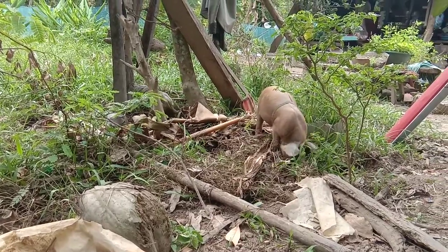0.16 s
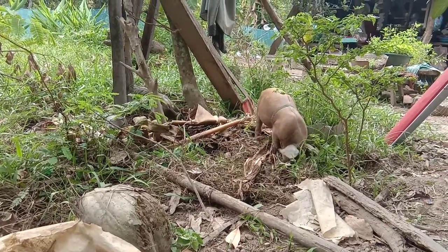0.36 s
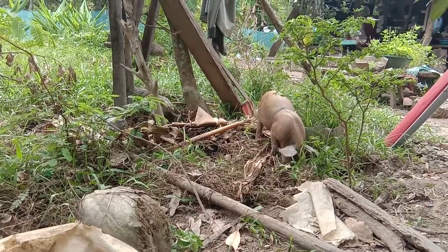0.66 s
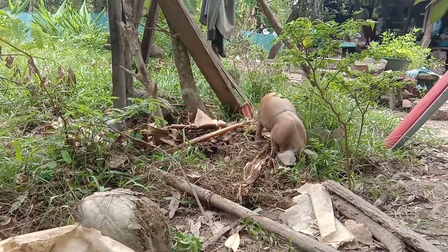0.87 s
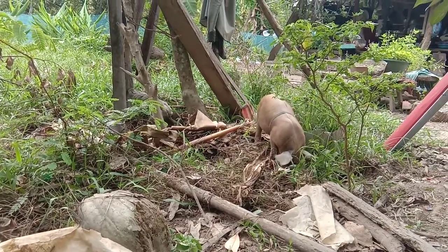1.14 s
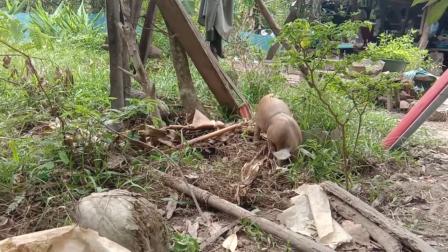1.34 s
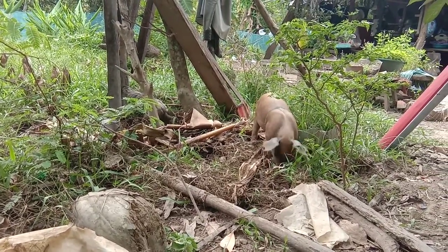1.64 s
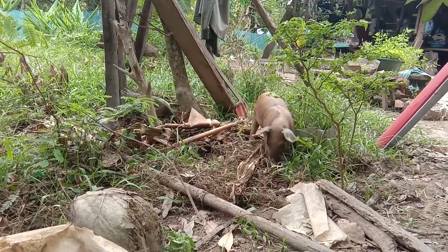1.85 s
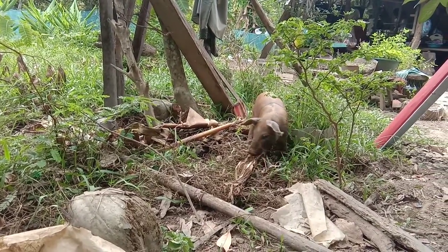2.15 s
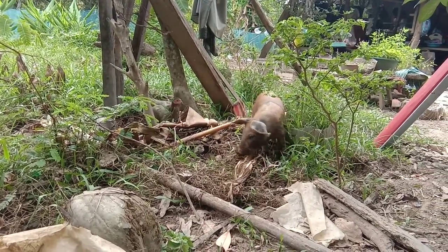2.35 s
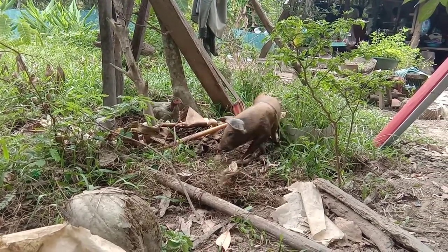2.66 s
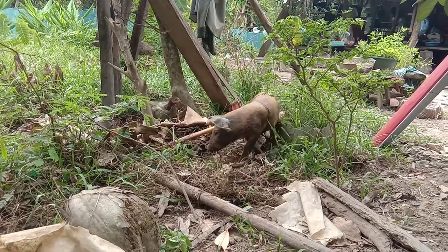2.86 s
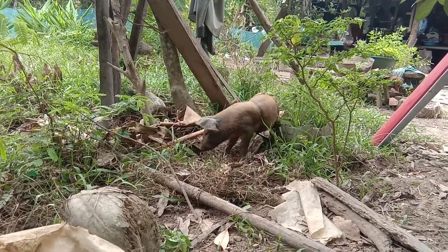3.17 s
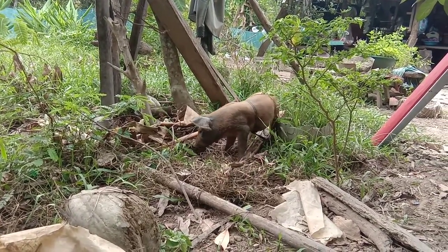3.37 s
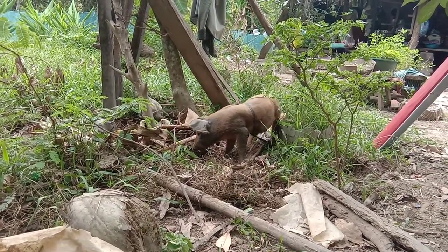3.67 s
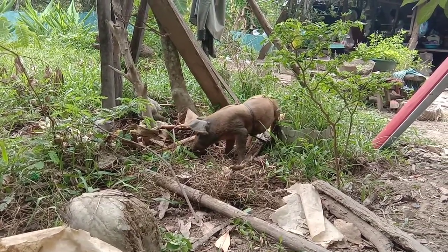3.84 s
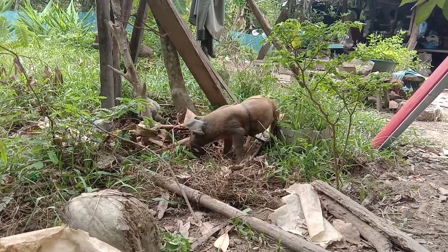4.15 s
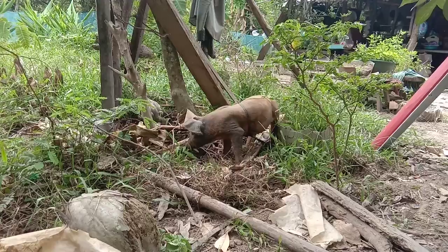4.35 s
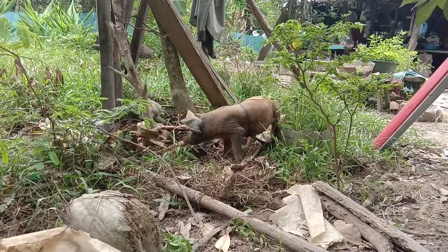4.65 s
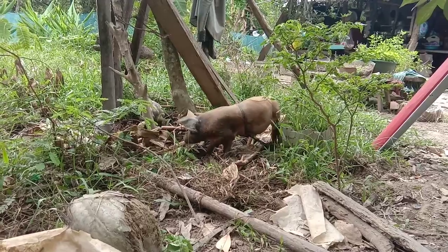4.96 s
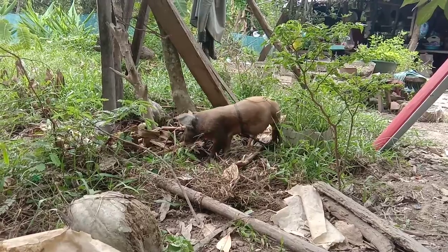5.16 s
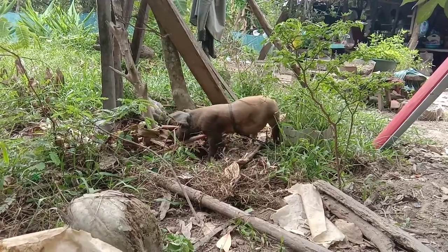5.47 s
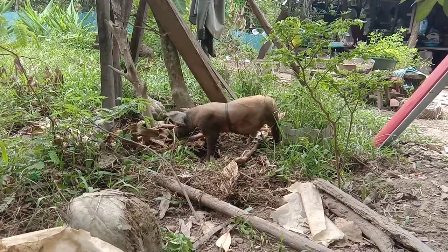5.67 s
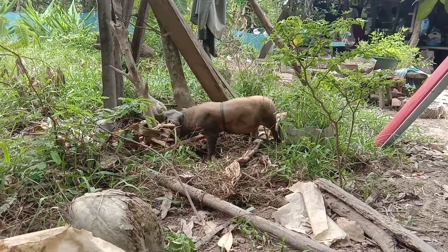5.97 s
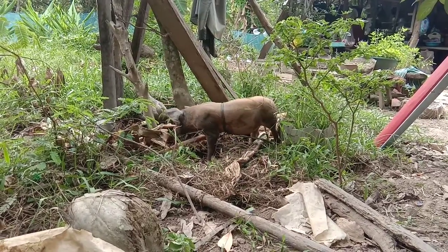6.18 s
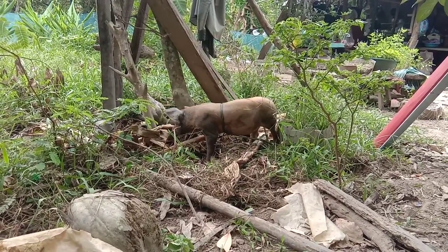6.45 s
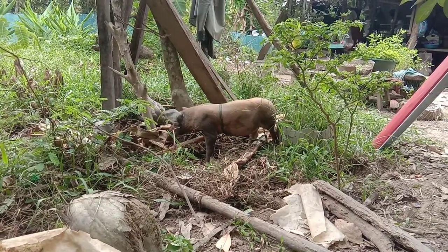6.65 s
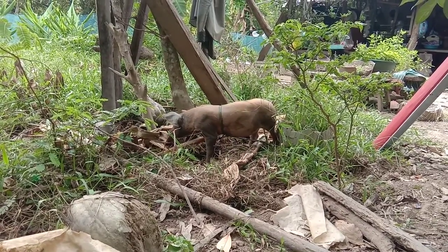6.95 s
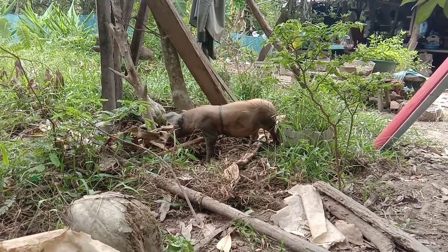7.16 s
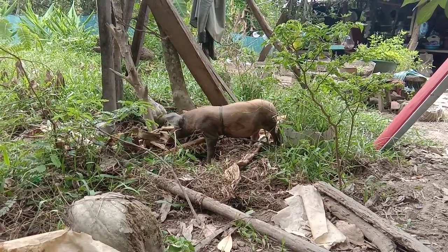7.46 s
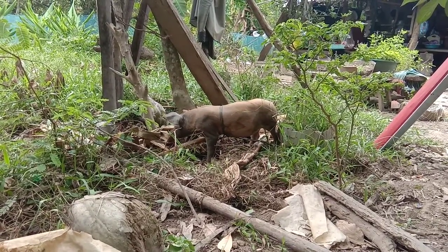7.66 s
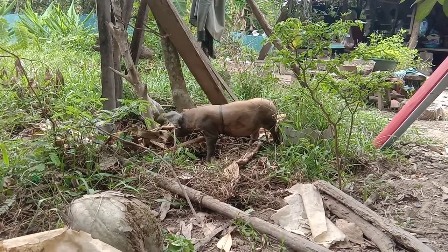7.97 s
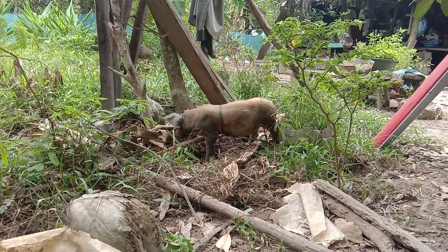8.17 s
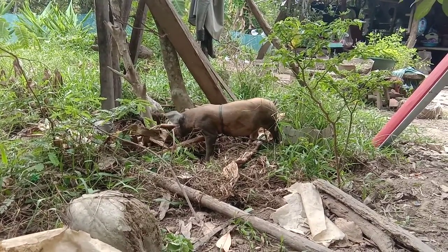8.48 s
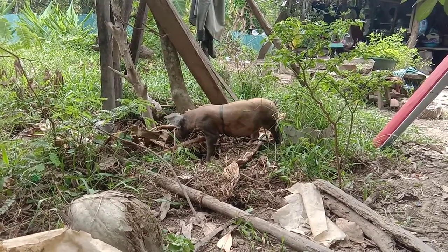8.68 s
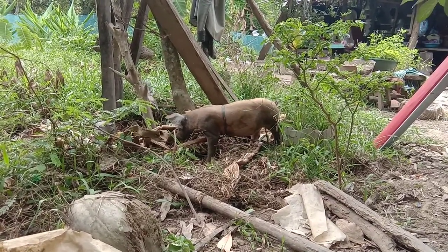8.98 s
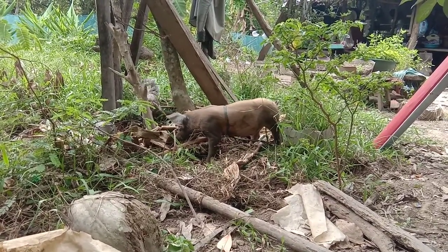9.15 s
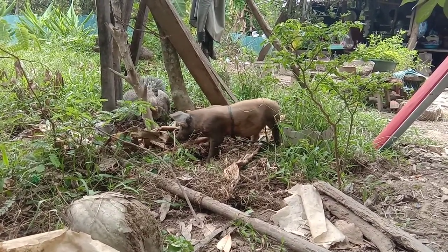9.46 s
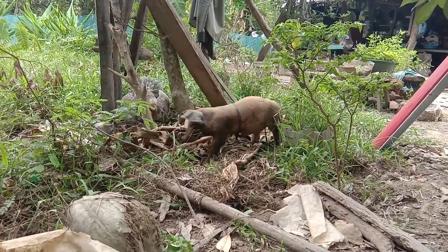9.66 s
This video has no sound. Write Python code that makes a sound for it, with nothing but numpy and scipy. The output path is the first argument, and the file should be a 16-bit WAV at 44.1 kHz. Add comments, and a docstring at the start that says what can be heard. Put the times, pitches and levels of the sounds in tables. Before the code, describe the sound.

High, falling chick peeps over soft yard hiss, with scattered hen clucks, one squawk, leaf crackle, snapping twigs and a late wing flurry.

```python
"""A rural yard: a hen and her chicks among dry leaves, picked up almost in mono by a phone.
The chicks peep and trill with gliding near-sines; the hen clucks, whines and squawks once, harmonics
ringing in her throat. Leaves rustle in tiny grains as a piglet roots, twigs crack, and at the end
a chicken flaps up with bursts of noise. Thin calls of small birds come from far off over a low, hissing
yard air; weak echoes return from posts and sheds."""
import sys
import numpy as np
from scipy import signal
from scipy.fft import rfft, irfft, next_fast_len
from scipy.io import wavfile

SR = 44100
rng = np.random.default_rng(int(sys.argv[2]) if len(sys.argv) > 2 else 0)


def dump_mix(stems):
    """Bounce the given channels to the path in sys.argv[1] as a 16-bit WAV at rate SR."""
    frames = np.atleast_2d(stems).T  # one column per channel
    limited = np.clip(frames, -1, 1)  # hard clip at full scale
    pcm = np.round(limited * 32767).astype(np.int16)
    wavfile.write(sys.argv[1], SR, pcm)


N = 433062
TIME = np.arange(N) / SR
CUTOFF_HZ = 15300  # top of the phone's range


def undb(db):
    """Decibels to an amplitude factor."""
    return 10 ** (np.asarray(db) / 20)


def unit(x):
    """Scale to rms 1."""
    return x / np.sqrt(np.mean(x ** 2) + 1e-20)


def curve(rows, t):
    """Columns of a table joined by straight lines in time."""
    times, *columns = np.transpose(rows)
    return [np.interp(t, times, column) for column in columns]


def add(out, start, x):
    """Mix x in from a start in seconds."""
    i = max(int(start * SR), 0)
    out[i:i + len(x)] += x[:max(len(out) - i, 0)]


def colour(x, outline):
    """Filter by an outline of frequency in Hz and gain in dB."""
    hz, db = np.transpose(outline)
    f = np.fft.rfftfreq(len(x), 1 / SR) + 1
    gain_db = np.interp(np.log(f), np.log(hz), db)
    return irfft(rfft(x) * undb(gain_db), len(x))


def band(size, hz, width_hz):
    """Noise in one rounded band, rms 1."""
    n = next_fast_len(size)
    f = np.fft.rfftfreq(n, 1 / SR)
    spectrum = rfft(rng.standard_normal(n)) / (1 + ((f - hz) / width_hz) ** 4)
    return unit(irfft(spectrum, n)[:size])


def walk(size, rate):
    """Smooth chance with a spread near 1: random points, rate per second, joined by lines."""
    u = np.arange(size) * rate / SR
    count = int(u[-1]) + 2
    # joining by lines shrinks the spread; the factor restores it
    return np.sqrt(3 / 2) * np.interp(u, np.arange(count), rng.standard_normal(count))


# Outline of the distant hiss. Each row: frequency in Hz, relative level in dB.
YARD_HISS = [(15, -35), (25, -16), (104, 4), (204, -6.5), (322, -14), (445, -14.5), (614, -15), (1750, -15),
             (3000, -15), (4150, -13), (5000, -14.5), (5570, -11), (7700, -11.5), (9810, -24.5),
             (15500, -29.5)]
# Low rumble of the air. Each row: time in seconds, level in dB before the overall trim.
RUMBLE = [(0, -50), (.3, -66.5), (2.5, -60), (3.3, -66), (3.7, -56), (4.2, -57.5), (5, -53.5), (6.1, -56),
          (6.6, -56.5), (8.2, -63.5), (9.4, -58), (9.8, -60)]


def yard_air(hiss_db=-53.5, rumble_trim_db=-3.0, flicker_db=2.0):
    """Distant outdoor hiss over a low rumble whose bands swell each on their own."""
    hiss = unit(colour(rng.standard_normal(N), YARD_HISS))
    hiss = hiss * undb(hiss_db + .5 * walk(N, 6.6))
    bands = band(N, 59.3, 14.4), 0.79 * band(N, 99.4, 27.0), 0.37 * band(N, 195, 48.0)
    rumble = unit(sum(b * undb(flicker_db * walk(N, 13)) for b in bands))
    return hiss + rumble * undb(curve(RUMBLE, TIME)[0] + rumble_trim_db)


def surroundings(x, near_db, far_db, near_s=0.014, t60=0.21):
    """Quick scatter from ground and posts, then a thin tail from trees and sheds."""
    t = np.arange(SR // 2) / SR
    near = rng.standard_normal(len(t)) * (rng.random(len(t)) < .02)  # sparse returns
    near = near * np.exp(-t / near_s) * (t > .002)
    far = rng.standard_normal(len(t)) * undb(-60 * t / t60) * (t > .015)
    echo = undb(near_db) * near / np.linalg.norm(near) + undb(far_db) * far / np.linalg.norm(far)
    return x + signal.fftconvolve(x, echo)[:N]


def bounces(x, db, spread_s=.012, late_db=-16, count=4):
    """Ground and posts return quick copies, a shed wall one late one; paths differ for each call."""
    paths = rng.random((count, 2))
    out = np.r_[x, np.zeros(SR // 10)]
    for lag, size in paths:
        copy = x * undb(db) * (size + .5) * rng.choice([-1, 1])
        add(out, 0.00043 + spread_s * lag ** 2, copy)
    add(out, 0.023 + .025 * rng.random(), x * undb(late_db))
    return out * np.linalg.norm(x) / np.linalg.norm(out)  # echoes add no energy


def whistle(hz, waver, octave_db=-30):
    """A tiny syrinx: nearly a sine, with a faint octave."""
    phase = 2 * np.pi * np.cumsum(hz * (1 + waver * walk(len(hz), 523.7))) / SR
    return np.sqrt(2) * (np.sin(phase) + undb(octave_db) * np.sin(2 * phase))


# Thin calls of a distant bird. Each row: start in seconds, level in dB before the trees smear it.
TSIPS = [(0.451, -48), (.88, -54), (1.39, -48), (1.97, -48.5), (3.321, -48.5), (4.012, -50), (4.56, -48.5),
         (4.97, -53), (5.56, -46), (6.283, -46), (6.729, -48.5), (7.291, -47), (7.931, -45.5), (8.549, -47),
         (9.03, -55.5)]
# Chirps of a second distant bird. Each row: start in seconds, first pitch in Hz, drop in Hz,
# level in dB before the smear, pitch waver as a share.
FAR_CHIRPS = [(4.79, 3445, 600, -51, 0.062), (7.76, 3120, 40, -57.5, 0.024)]


def far_birds(top_hz=7550, dip_hz=1000, length_s=.1, smear_s=0.017):
    """A thin warbling note and a few lower chirps, all smeared by the trees."""
    out = np.zeros(N)
    u = np.linspace(0, 1, int(length_s * SR))
    for start, db in TSIPS:
        hz = top_hz - dip_hz * np.sin(2 * np.pi * u) ** 4 * (1 - u ** 2)
        swell = np.minimum(u / 0.012, 1) * (1 - u) ** .5
        add(out, start, whistle(hz, waver=0.015) * undb(db) * swell)
    for start, hz, drop_hz, db, waver in FAR_CHIRPS:
        add(out, start, whistle(hz - drop_hz * u, waver) * undb(db) * np.sin(np.pi * u) ** .5)
    t = np.arange(SR // 3) / SR
    trees = rng.standard_normal(len(t)) * np.exp(-t / smear_s)
    return signal.fftconvolve(out, trees / np.linalg.norm(trees))[:N]


# Feet, snout and wings stir the dry leaves. Each row: start of the full stir in seconds,
# length in seconds, level in dB.
STIRS = [(.02, 0.18, -58.5), (2.278, 0.044, -59), (2.398, 0.036, -53), (2.523, 0.12, -49),
         (2.679, 0.076, -56), (2.808, 0.029, -50.5), (3.02, 0.071, -50), (3.265, 0.1, -52),
         (4.67, 0.083, -51), (4.853, 0.2, -57.5), (5.12, 0.24, -59), (5.344, 0.059, -59),
         (5.506, 0.19, -53.5), (5.766, 0.14, -55), (6.109, 0.027, -45), (8.244, 0.015, -54),
         (9.03, .03, -58.5), (9.642, 0.042, -42), (9.762, 0.081, -42)]
# Outline of the crackle. Each row: frequency in Hz, relative level in dB.
LEAF_CRACKLE = [(300, -10.5), (1000, -17), (2500, -12), (5000, -1.5), (7500, -0.5), (9800, -13),
                (11500, -8.5), (15500, -12.5)]


def litter(grains_per_s=1700, spread_db=6, clump_db=2.0, shove_db=2.0, dense_db=-45):
    """Leaves crackle in clumps of tiny grains; a stir swells and settles, a hard one rustles densely."""
    force = np.zeros(N)
    for start, length, db in STIRS:
        # time constants: a short edge plus a share of the length
        attack_s, release_s = 0.018 + 0.58 * length, 0.018 + 0.22 * length
        before = np.minimum(TIME - start, 0)
        after = np.maximum(TIME - start - length, 0)
        force += undb(db) * np.exp(before / attack_s - after / release_s)
    density = np.minimum(grains_per_s / SR * (1 + (force / undb(dense_db)) ** 2), 1)
    sizes = undb(spread_db * np.minimum(rng.exponential(size=N), 3.5))
    grains = (rng.random(N) < density) * rng.choice([-1, 1], N) * sizes
    clumps = undb(clump_db * walk(N, 140) + shove_db * walk(N, 20))
    return unit(colour(grains / np.sqrt(density) * clumps, LEAF_CRACKLE)) * force


# Twigs cracking. Each row: start in seconds, approximate peak in dB, centre in Hz.
TWIGS = [(2.378, -39, 9000), (2.415, -30.5, 7060), (2.822, -40, 9000), (2.849, -34, 7100),
         (3.108, -41, 8340), (3.294, -30, 6740), (3.32, -43, 11000), (5.04, -42, 12000), (5.226, -27, 5430),
         (5.458, -38.5, 10000), (5.562, -28, 5350), (5.57, -35, 9500), (6.097, -30, 7340),
         (6.128, -31.5, 5500), (9.68, -31, 6460), (9.684, -27, 5970)]


def twigs(snap_s=0.0033):
    """A thin twig cracks with a brief, bright tick of decaying noise."""
    out = np.zeros(N)
    t = np.arange(SR // 40) / SR
    for start, db, hz in TWIGS:
        # noise of rms 1 peaks well above 1, so it is halved
        add(out, start, .5 * undb(db) * band(len(t), hz, 0.27 * hz) * np.exp(-t / snap_s))
    return out


# Wing strokes. Each row: middle in seconds, air thump in dB, feather slap in dB,
# time from the middle down to 1/e in seconds.
WINGBEATS = [(9.547, -54.5, -54.5, 0.008), (9.62, -49.5, -57, 0.018), (9.659, -50.5, -53, 0.01),
             (9.682, -41, -40.5, 0.0033), (9.698, -49, -48.5, 0.014), (9.795, -62, -51.5, 0.0037)]


def wings(feather_db=-3):
    """Each stroke pushes a puff of air, slaps the body and swishes the feathers."""
    out = np.zeros(N)
    t = np.arange(-SR // 30, SR // 30) / SR
    for middle, thump_db, slap_db, stroke_s in WINGBEATS:
        slap = band(len(t), 980, 610) + undb(feather_db) * band(len(t), 5100, 3000)
        stroke = undb(thump_db) * band(len(t), 184, 106) + undb(slap_db) * slap
        add(out, middle + t[0], stroke * np.exp(-(t / stroke_s) ** 2))
    return out


# Resonances of the hen's throat. Each row: centre in Hz, full width in Hz, relative gain in dB.
THROAT = [(218, 63, 10.5), (526, 280, 0), (740, 37, -8), (1019, 83, 2), (1240, 330, -0.5), (1676, 130, 1.5),
          (2325, 120, 11.5), (3560, 600, 13), (5540, 1500, 15.5)]


def hen_call(rows, ring_db=0, ring_hz=1030, hiss_db=-21, jitter=0.162, shimmer=2.06,
             closed_db=-15, rasp_db=-9, ring_width_hz=130):
    """Harmonics through the throat; a closed beak dulls, roughness shakes, one resonance may grow."""
    t = np.arange(rows[0][0], rows[-1][0], 1 / SR)
    hz, db, rough, beak = curve(rows, t)
    rough = np.clip(rough, 0, 1)
    shaken_hz = hz * (1 + jitter * (rough + 0.04) * walk(len(t), 451.0))
    phase = 2 * np.pi * np.cumsum(shaken_hz) / SR
    k = np.arange(1, 17)[:, None]  # harmonic numbers
    f = k * hz
    gain = sum(undb(g) / (1 + (2 * (f - centre) / width) ** 2) for centre, width, g in THROAT)
    octaves = np.log2(np.maximum(f / 800, 1))
    gain = gain * undb(closed_db * (1.5 - beak) * octaves) * (f < CUTOFF_HZ)
    ring = np.exp(-((f - ring_hz) / ring_width_hz) ** 2)
    gain = gain * undb(ring_db * np.linspace(0, 1, len(t)) * ring)
    gain /= np.sqrt(np.sum(gain ** 2, axis=0) / 2)
    lags = 2 * np.pi * rng.random(k.shape)  # the windpipe holds each harmonic back by its own amount
    voice = np.sum(gain * np.sin(k * phase + lags), axis=0)
    voice = voice * (1 + shimmer * rough * walk(len(t), 498.4))
    pulses = 1 + np.cos(phase)  # breath noise comes once a cycle
    rasp = undb(rasp_db) * rough * band(len(t), 600, 400) * pulses
    hiss = undb(hiss_db) * beak ** 2 * band(len(t), 2200, 2000) * pulses  # air through the open beak
    return (voice + rasp + hiss) * undb(db) * signal.windows.tukey(len(t), .05)


def broken_cluck(start, growl_s, knee_hz, top_hz, close_hz, db, growl_db, beak, growl_rough=0.22):
    """Rows of a call that starts hoarse, climbs, breaks into a sagging growl and jumps up to close."""
    climb_s, break_s, close_s = .046, 0.007, 0.021
    growl_hz, sag_hz = 263.3, 1196 * growl_s  # it sags by 1196 Hz per second
    growl = start + climb_s + break_s
    close = growl + growl_s + break_s
    # each row: time in seconds, pitch in Hz, level in dB, roughness 0-1, beak opening 0-1
    return [(start, 263, db - 6, .25, 0),
            (start + .4 * climb_s, knee_hz, db - 0.5, .08, beak),
            (start + climb_s, top_hz, db - 3.5, .1, beak),
            (growl, growl_hz, growl_db - 1.0, growl_rough, .25),
            (growl + growl_s / 2, growl_hz - sag_hz / 2, growl_db, growl_rough, .15),
            (growl + growl_s, growl_hz - sag_hz, growl_db - 5, growl_rough, .15),
            (close, close_hz, db, .15, beak),
            (close + close_s / 2, close_hz, db + 2.0, .08, beak),
            (close + close_s, 0.88 * close_hz, db - 11, .2, 0)]


# The hen's whine and her squawk. Each row: time in seconds, pitch in Hz, level in dB,
# roughness 0-1, beak opening 0-1.
WHINE = [(2.945, 822, -57.5, 0.62, 0.9), (3.0, 885, -42, 0.26, 0.14), (3.025, 919, -72, 0.3, .1),
         (3.055, 927, -38, 0.1, 0.3), (3.07, 963, -31.5, 0, 0.15), (3.086, 956, -34, 0, .13),
         (3.097, 936, -66, 0.1, .1), (3.14, 826, -47, 0.13, 0), (3.165, 790, -71, 0.2, .1)]
SQUAWK = [(8.378, 249, -52, .5, 0), (8.397, 262, -48.5, 0.31, 0.1), (8.43, 311.5, -53.5, 0.41, 0.71),
          (8.45, 881, -60, .1, 0), (8.475, 864, -58, .05, 0), (8.486, 738, -48, .16, 0),
          (8.497, 477, -39, 0.14, 0.47), (8.52, 468, -37.5, 0.036, 0.94), (8.545, 489, -33.5, 0.27, .82),
          (8.57, 456.4, -35, 0.079, 0.94), (8.6, 465.6, -34, 0.048, 0.91), (8.62, 462.5, -38.5, 0.18, 0.95),
          (8.65, 328, -55, 0.77, .4)]
# Calls that break between registers. Each row: start in seconds, growl length in seconds,
# mid-climb pitch in Hz, top pitch in Hz, closing pitch in Hz, reference level in dB,
# mid-growl level in dB, beak opening 0-1, resonance in Hz, resonance gain by the end in dB.
BROKEN_CLUCKS = [(.227, 0.049, 421.5, 434, 508, -38.5, -37.5, 0.56, 1040, 13),
                 (1.916, .042, 357, 542, 444, -44.5, -40.5, 0.25, 220, 4),
                 (5.885, .012, 430, 484, 654, -42, -41, 0.05, 600, 14)]
# Short soft clucks. Each row: start in seconds, length in seconds, first pitch in Hz, last pitch in Hz,
# mid-call level in dB, mid-call roughness 0-1, beak opening 0-1.
CLUCKS = [(6.39, 0.05, 275, 261, -57, 0.58, 0), (6.705, 0.038, 294, 530, -45, 0.2, 0.1),
          (6.855, 0.047, 332, 478, -51.5, 0.33, 0.92), (7.016, 0.043, 336, 429, -47.5, 0.1, 0.56),
          (7.204, 0.044, 355, 344, -53, 0.25, 0.85), (7.391, 0.11, 389, 355, -51.5, 0.13, 0),
          (7.552, 0.057, 360, 323, -51, 0.23, .1), (8.238, 0.047, 1248, 1130, -51, 0.72, 0.2),
          (9.35, 0.03, 341, 458, -46, 0.29, 0.3)]


def hen(cluck_edge_db=-12, cluck_edge_rough=0.096):
    """A whine, a squawk, calls that break between registers, and soft clucks that glide in pitch."""
    out = np.zeros(N)
    add(out, WHINE[0][0], hen_call(WHINE))
    add(out, SQUAWK[0][0], hen_call(SQUAWK, ring_db=7.5, ring_hz=1120, ring_width_hz=350))
    for *course, ring_hz, ring_db in BROKEN_CLUCKS:
        add(out, course[0], hen_call(broken_cluck(*course), ring_db, ring_hz))
    u = np.linspace(0, 1, 9)
    edge = 1 - np.sin(np.pi * u)  # 1 at both ends, 0 in the middle
    for start, length, first_hz, last_hz, db, rough, beak in CLUCKS:
        hz = (first_hz + u * (last_hz - first_hz)) * (1 + 0.011 * rng.standard_normal(len(u)))
        swell_db = db + cluck_edge_db * edge + 2 * rng.standard_normal(len(u))
        roughness = rough + cluck_edge_rough * edge
        beaks = np.full(len(u), beak)
        rows = np.column_stack([start + u * length, hz, swell_db, roughness, beaks])
        add(out, start, hen_call(rows))
    return out


def peep(top_hz, fall_s, db, near_bounce_db=-14, far_bounce_db=-5, flutter_db=0.9):
    """An arch of pitch that plunges; a harder (higher) call climbs longer and drops deeper."""
    effort = np.clip((top_hz - 3500) / 1700, .15, 1.2)
    near = np.interp(db, [-52, -36], [0, 1])  # fainter chicks stand further off, among more echoes
    rise_s = .028 * effort
    t = np.arange(-rise_s, 1.1 * fall_s, 1 / SR)
    v = np.where(t < 0, t / rise_s, t / fall_s)  # -1 at the start, 0 at the top
    climb = 1 - 0.1676 * effort * v ** 2
    plunge = 1 - (0.0893 + .4 * effort) * np.abs(v) ** 1.5
    hz = top_hz * np.where(v < 0, climb, plunge)
    # weak peeps die away before the pitch has dropped far
    decay_db = (37 - 11 * effort) * np.maximum(v - .28 - 0.13 * near, 0)
    swell_db = flutter_db * walk(len(t), 148) - 12 * np.minimum(v, 0) ** 2 - decay_db
    # the throat rings as the falling pitch of a loud peep passes it
    ring = np.exp(-((hz - 4423) / 90) ** 2) * np.clip(4 * v, 0, 1)
    swell_db = swell_db + near * 6 * (ring - .25)
    edges = signal.windows.tukey(len(t), .1)
    bounce_db = far_bounce_db + near * (near_bounce_db - far_bounce_db)
    sound = whistle(hz, waver=0.0086, octave_db=-19.5) * undb(db + swell_db) * edges
    return rise_s, bounces(sound, bounce_db, late_db=bounce_db - 6)


def arched_note(length, hz, buzz, bow=0.057, buzz_hz=330):
    """A short arch of pitch and level; the two sides of the syrinx may beat into a buzz."""
    t = np.arange(0, length, 1 / SR)
    arch = np.sin(np.pi * t / length)
    beat = np.clip(buzz, 0, 1) * np.sin(2 * np.pi * buzz_hz * t)
    bent_hz = hz * (1 - bow * (1 - arch) + 0.073 * beat)
    return whistle(bent_hz, waver=0.0085) * (1 + beat) * np.sqrt(arch)


# A trill rings at both turns of its pitch. Each row: frequency in Hz, gain in dB.
TRILL_THROAT = [(3700, 3.5), (4300, 3), (4800, -7), (5450, 1.5), (5900, 0.5)]


def trill(length, rate, low_hz, high_hz, db, fade_db, drop_hz, waver,
          flutter_db=3.0, bounce_db=-15, drop_s=0.006):
    """A chain of round pitch arches, which may blur and drop at the close."""
    t = np.arange(0, length, 1 / SR)
    arches = np.abs(np.sin(np.pi * rate * t)) ** .7
    hz = low_hz + (high_hz - low_hz) * arches - drop_hz * np.exp((t - length) / drop_s)
    swell = undb(db + fade_db * (t / length - 1.0) + flutter_db * walk(len(t), 103))
    swell = swell * signal.windows.tukey(len(t), .1)
    return colour(bounces(whistle(hz, waver) * swell, bounce_db), TRILL_THROAT)


# Peeps of the chicks, near and far. Each row: time of the top of the arch in seconds,
# top pitch in Hz, fall in seconds, level in dB before its swell.
PEEPS = [(0.128, 4830, 0.046, -36.5), (0.169, 4660, 0.053, -47), (.27, 4763, 0.03, -38),
         (0.347, 4550, .034, -47.5), (.495, 4100, .045, -55), (.526, 4700, 0.045, -34),
         (0.657, 4660, 0.038, -41.5), (.682, 4320, 0.033, -46.5), (.713, 4760, 0.044, -44.5),
         (.802, 4220, 0.043, -48), (.824, 4920, 0.042, -38), (.872, 4890, 0.036, -44.5),
         (1.007, 4780, 0.053, -33), (1.176, 5110, 0.049, -36), (1.261, 4480, 0.047, -53),
         (1.384, 5055, 0.061, -36.5), (1.573, 5220, 0.057, -36.5), (1.736, 5350, 0.047, -31.5),
         (1.812, 4850, 0.035, -42.5), (1.903, 5100, 0.045, -32), (2.02, 4390, 0.046, -43.5),
         (2.079, 4990, 0.051, -35.5), (2.115, 5160, 0.037, -43), (2.157, 4780, 0.054, -43.5),
         (2.255, 4740, 0.044, -45), (2.274, 4860, 0.042, -33.5), (2.403, 4770, 0.046, -43.5),
         (2.475, 4920, 0.077, -40.5), (2.508, 4990, 0.05, -33.5), (2.577, 4940, 0.051, -44),
         (2.652, 4110, 0.035, -46.5), (2.748, 4580, 0.052, -38.5), (2.931, 4780, 0.046, -42.5),
         (3.336, 5090, 0.056, -43.5), (3.415, 4480, 0.055, -44.5), (3.513, 5160, 0.057, -37.5),
         (3.69, 4330, 0.027, -46), (3.771, 4880, 0.061, -42.5), (3.85, 4120, 0.049, -52.5),
         (3.992, 4730, 0.051, -40), (4.173, 4200, 0.062, -50.5), (4.282, 4850, 0.08, -46.5),
         (4.305, 4200, 0.031, -49), (4.51, 4715, 0.059, -45), (4.535, 4190, 0.031, -48),
         (4.72, 4260, .05, -57), (4.861, 4400, 0.07, -45), (4.92, 4450, 0.048, -54.5),
         (5.08, 4050, 0.039, -53.5), (5.145, 4630, 0.08, -56.5), (5.433, 4050, .046, -52.5),
         (5.531, 4410, 0.055, -52), (5.566, 4210, 0.025, -44.5), (5.655, 4110, 0.038, -53),
         (5.7, 4230, 0.049, -47.5), (5.79, 3990, 0.056, -53.5), (5.9, 4430, 0.055, -48),
         (6.177, 4390, 0.035, -43), (6.28, 3970, 0.033, -57), (6.4, 4490, 0.068, -53),
         (6.446, 4240, 0.063, -48.5), (6.569, 4900, 0.077, -53), (6.71, 4230, 0.043, -54.5),
         (6.84, 4120, 0.025, -50.5), (6.9, 4260, 0.049, -54.5), (7.02, 4260, 0.031, -54),
         (7.059, 4220, 0.069, -53.5), (7.215, 4700, 0.07, -53.5), (7.255, 4280, 0.047, -53),
         (7.365, 4200, 0.053, -55.5), (7.428, 4450, 0.042, -48), (7.462, 4980, 0.08, -53),
         (7.612, 4480, 0.04, -50), (7.695, 4260, 0.041, -50), (7.78, 4690, 0.077, -55),
         (7.855, 4350, 0.039, -50), (7.908, 3860, 0.049, -57), (7.976, 4430, 0.057, -52),
         (7.989, 4830, 0.062, -55), (8.014, 4090, 0.043, -51.5), (8.08, 4130, 0.04, -56),
         (8.16, 4260, 0.05, -50), (8.19, 4180, 0.045, -52), (8.28, 4860, 0.068, -48),
         (8.325, 4390, 0.053, -46.5), (8.474, 4540, 0.032, -51), (8.5, 4940, 0.049, -46.5),
         (8.902, 3820, 0.064, -54), (8.952, 4100, 0.044, -49), (9.04, 4080, 0.042, -54),
         (9.082, 4380, 0.042, -46.5), (9.191, 4270, 0.048, -48.5), (9.246, 4360, 0.037, -45),
         (9.285, 4300, 0.064, -52), (9.366, 4300, .03, -46), (9.38, 4460, 0.038, -43.5),
         (9.415, 4670, 0.051, -50), (9.46, 4640, 0.026, -48), (9.52, 4610, 0.038, -44.5),
         (9.557, 4220, .033, -48), (9.75, 4130, 0.046, -50.5)]
# Short arched notes: second voices at the tops of hard peeps, and the loud start of the last trill.
# Each row: start in seconds, length in seconds, pitch at the top of its arch in Hz,
# level in dB, buzz 0-1.
ARCHED_NOTES = [(.661, 0.033, 4940, -51, 0.8), (0.811, 0.022, 5460, -39.5, 0.2),
                (1.172, 0.011, 5530, -46.5, 0.1), (1.567, 0.024, 5660, -43, 0.2),
                (1.721, 0.031, 5770, -42, 0.1), (1.897, 0.019, 5550, -44.5, 0.3),
                (1.942, 0.036, 5470, -46, 0.4), (9.573, .015, 5010, -33.5, 0)]
# Chick trills. Each row: start in seconds, length in seconds, arches per second, low pitch in Hz,
# high pitch in Hz, level at the end in dB, change of level up to there in dB, closing drop in Hz,
# pitch waver as a share.
TRILLS = [(2.675, .12, 35, 3930, 5420, -37.5, 1, 0, 0.0092), (2.923, .02, 42, 4460, 5380, -39.5, 3, 0, .01),
          (2.943, 0.056, 37.6, 4116, 5590, -38, -6.5, 0, 0.013),
          (2.998, 0.082, 36.5, 4255, 5430, -41.5, 2, 1100, 0.052),
          (9.576, 0.042, 25, 4530, 5350, -35, 6, 0, 0.0086),
          (9.615, 0.034, 30, 4220, 5130, -34.5, -3.5, 0, .015)]


def chicks():
    """Peeps, short arched notes and trills, near-sines gliding in pitch."""
    out = np.zeros(N)
    for top_s, top_hz, fall_s, db in PEEPS:
        rise_s, sound = peep(top_hz, fall_s, db)
        add(out, top_s - rise_s, sound)
    for start, length, hz, db, buzz in ARCHED_NOTES:
        add(out, start, bounces(arched_note(length, hz, buzz) * undb(db), -21))
    for start, *shape in TRILLS:
        add(out, start, trill(*shape))
    # the phone's dip near 10 kHz takes most of the upper octave
    return colour(out, [(8500, 2.5), (9800, -59)])


# Diffuse yard air that differs between the ears. Each row: frequency in Hz, gain in dB.
WIDTH = [(30, -20), (70, -34), (300, -9.5), (1000, -10), (2500, -12.5), (5000, -20), (8000, -41.5),
         (12000, -10)]


def scene(bird_side_db=-24):
    """All stands ahead; only a trace of the yard air and the far birds differs between the ears."""
    mid = surroundings(chicks() + twigs(), near_db=-15.5, far_db=-12.5)
    mid = mid + surroundings(hen() + wings(), near_db=-10, far_db=-15.5)
    mid = mid + surroundings(litter(), near_db=-5, far_db=-5)
    mid = mid + far_birds() + yard_air()
    side = colour(yard_air(), WIDTH) + undb(bird_side_db) * far_birds()
    return np.array([mid + side, mid - side])


def record(dry):
    """The phone's microphones drop the deepest bass and cut the top."""
    dry = signal.sosfilt(signal.butter(4, 36, "high", fs=SR, output="sos"), dry)
    return signal.sosfilt(signal.ellip(10, .2, 70, CUTOFF_HZ, fs=SR, output="sos"), dry)


dry = scene()
out = record(dry)
dump_mix(out)
```